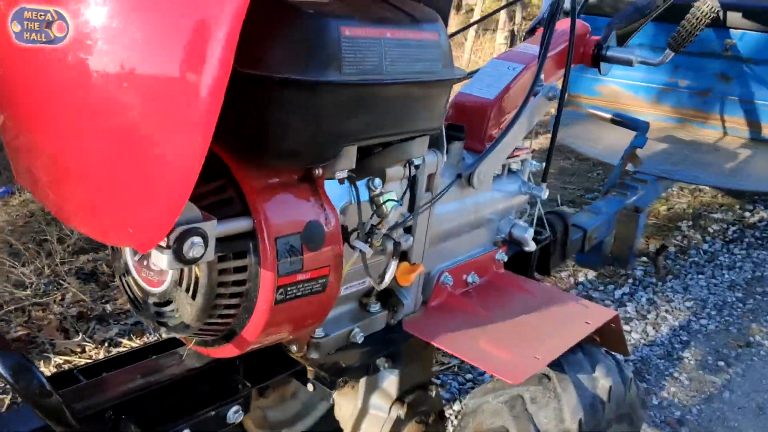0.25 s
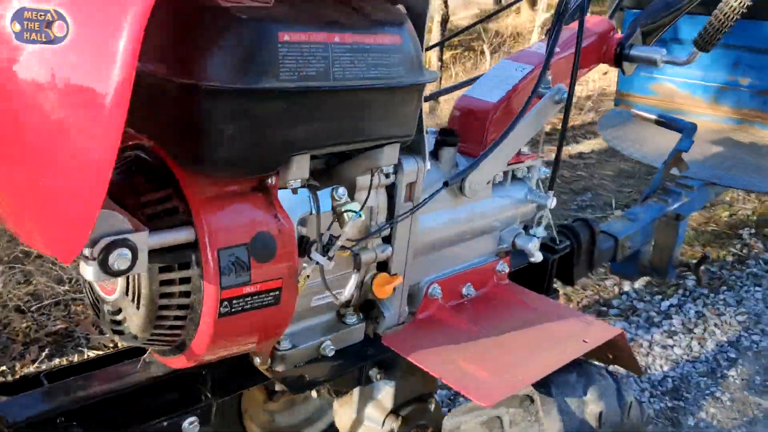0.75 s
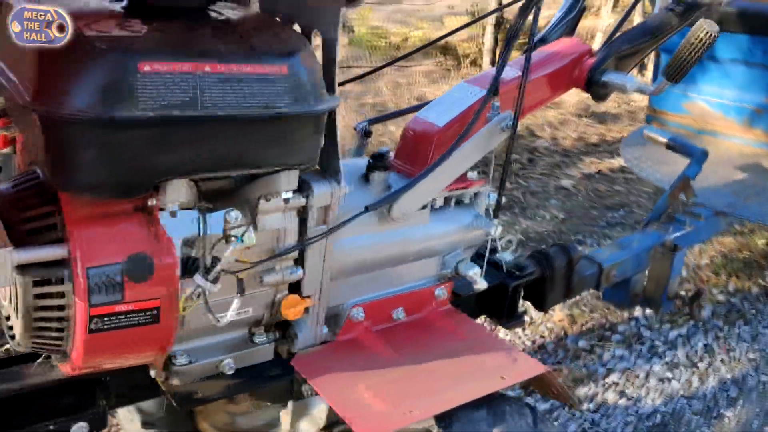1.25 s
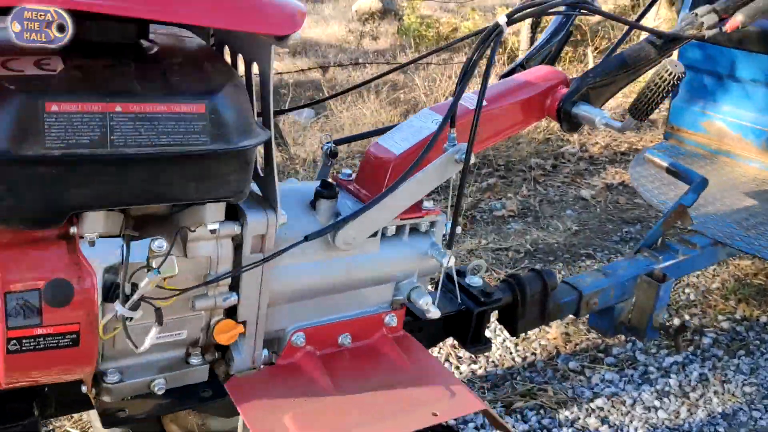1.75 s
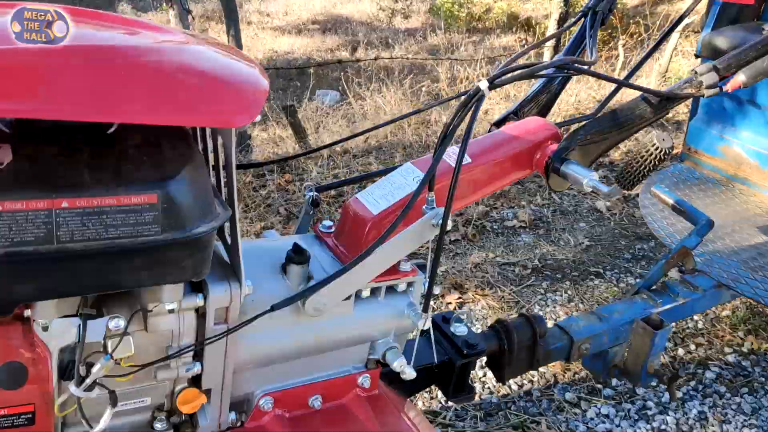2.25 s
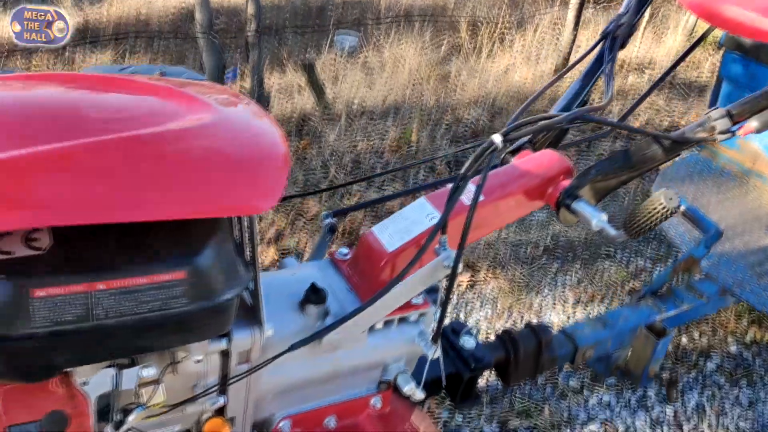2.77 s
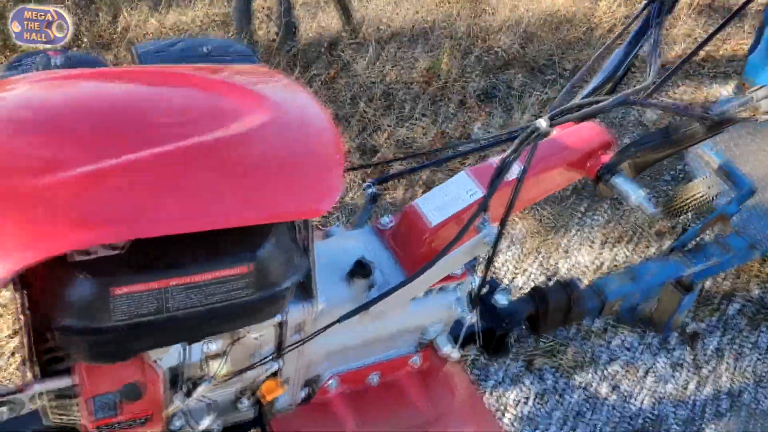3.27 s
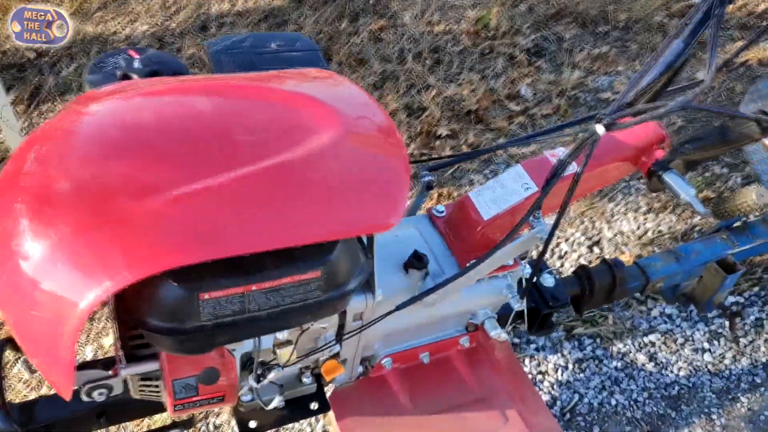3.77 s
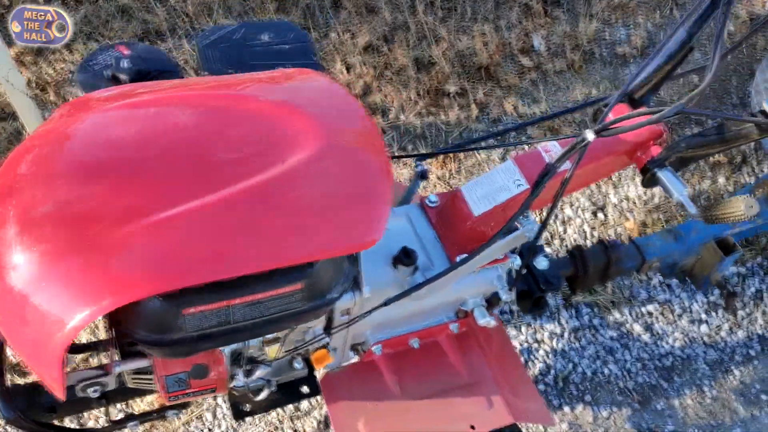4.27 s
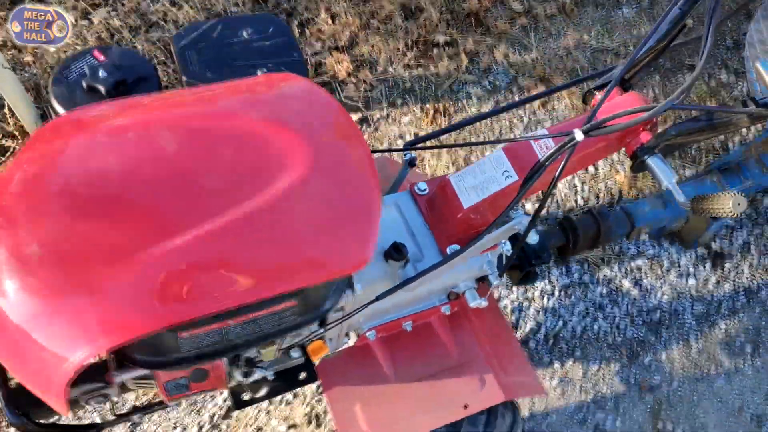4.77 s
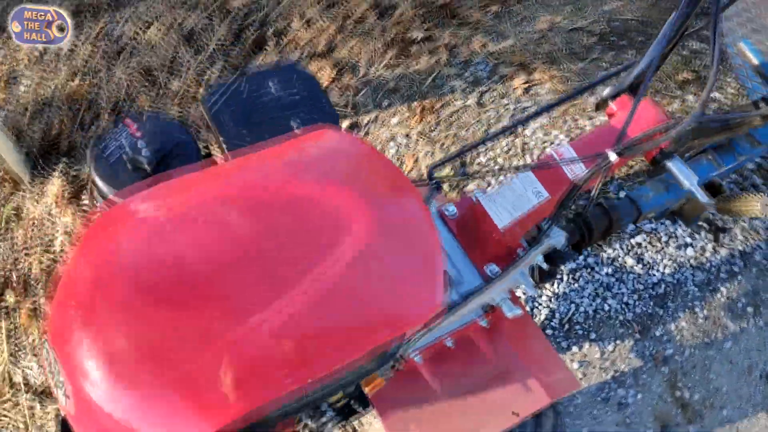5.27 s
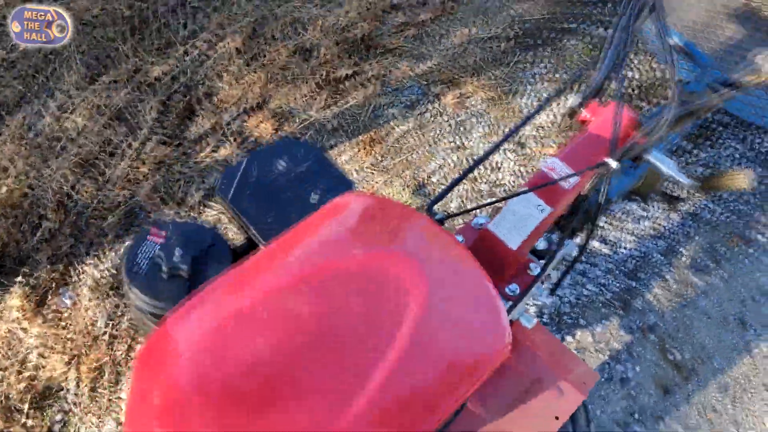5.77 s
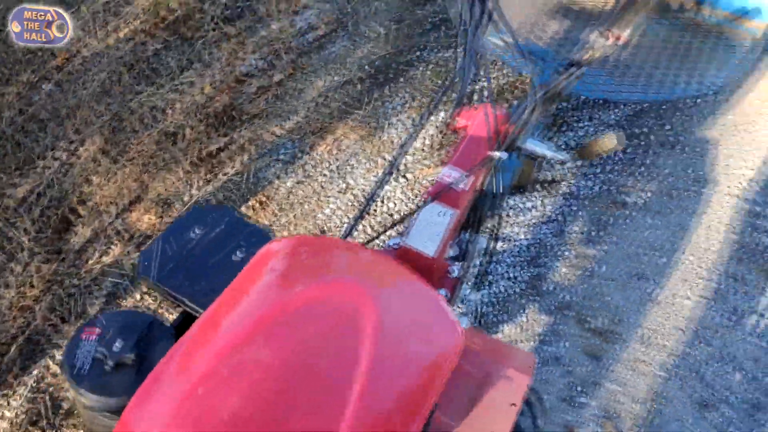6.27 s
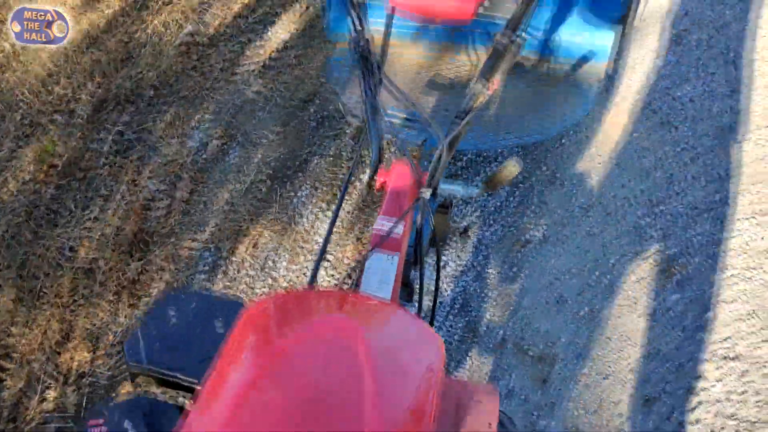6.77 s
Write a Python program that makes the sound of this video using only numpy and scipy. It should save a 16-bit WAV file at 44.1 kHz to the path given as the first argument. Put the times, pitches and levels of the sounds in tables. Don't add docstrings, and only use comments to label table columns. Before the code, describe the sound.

Close outdoor stereo of a small petrol engine idling with a fast, even, tinny buzz, stronger on the left. It starts rough with brief tin ringing, stumbles slightly around two seconds, then runs on. Finger knocks and clicks hit the handheld recorder, a shoe scrapes gravel just after four seconds, a very sharp click comes on the right past five, and the buzz dies near the end under soft wind.

```python
import sys
import numpy as np
from scipy import signal
from scipy.fft import rfft, irfft
from scipy.io import wavfile
from scipy.ndimage import map_coordinates

SR = 44100
rng = np.random.default_rng(int(sys.argv[2]) if len(sys.argv) > 2 else 0)


def to_wav(s):
    ch = np.atleast_2d(s).T
    pcm = np.round(np.clip(ch, -1, 1) * 32767)
    wavfile.write(sys.argv[1], SR, pcm.astype(np.int16))


def natural_amplitude(level_db):
    exponent = np.asarray(level_db, float) / 20
    return 10 ** exponent


N = 309582

# (time [s], rattle level [dB], left over right as the recorder turns [dB],
# share of the engine hidden by its hood [0-1])
WALK = [(0, -40.5, 15, 0.2), (.6, -37, 19, 0.26), (1.0, -36, 17, 0.19), (1.43, -36, 21, 0.02),
        (1.72, -38, 19.5, 0.3), (1.99, -37.5, 17.5, 0.23), (2.38, -38, 12.5, 0.34), (2.62, -36.5, 17, 0.26),
        (3.36, -37, 14.5, 0.34), (3.6, -43, 14, 0.4), (3.95, -40, 13.5, 0.5), (4.36, -40, 10.5, 0.73),
        (4.75, -39, 11, 0.63), (5.02, -46, 11, 0.8), (5.47, -45, 12, 0.73), (5.75, -40, 11, 0.9),
        (6.16, -37, 14, 0.86), (6.32, -41, 13.5, 0.55)]
# (start [s], end [s], steady over loose hum [dB], steady over loose rattle [dB])
STUMBLES = [
    (-.1, .45, 3, -4),
    (2.04, 2.47, -4, -2),
    (4.17, 4.55, 8, 1),
    (6.47, 7.2, -12, -15),
]
DIES_S, DIES_SPAN_S = 6.35, 0.18


def in_time(rows, outside=None):
    s, *columns = np.transpose(rows)
    return [np.interp(np.arange(N) / SR, s, c, outside, outside) for c in columns]


def at_hz(points, hz):
    points = np.array(points, float)
    return np.array([np.interp(np.log(hz), np.log(points[:, 0]), c) for c in points.T[1:]])


def rms_one(x):
    return x / np.sqrt(np.mean(x ** 2) + 1e-20)


def bump(s, half_s, order=2):
    return np.exp(-((np.arange(N) / SR - s) / half_s) ** order)


def ramp(s, span_s):
    return np.clip((np.arange(N) / SR - s) / span_s, 0, 1)


def drift(rate_hz):
    r = np.exp(-2 * np.pi * rate_hz * 64 / SR)
    noise = rng.standard_normal(N // 64 + 2002)
    slow = signal.lfilter([1], [1, -2 * r, r * r], noise)[2000:]
    slow = rms_one(slow - slow.mean())
    lines = slow[:-1, None] + np.diff(slow)[:, None] * np.arange(64) / 64
    return lines.ravel()[:N]


def band(x, low_hz, high_hz):
    sos = signal.butter(2, [low_hz, min(high_hz, .45 * SR)], "band", fs=SR, output="sos")
    return signal.sosfilt(sos, x)


def colour(x, points):
    top_hz = 15800
    hz = np.maximum(np.fft.rfftfreq(N, 1 / SR), 1)
    return irfft(rfft(x) * natural_amplitude(at_hz(points, hz)) * (hz < top_hz), N)


def both(pan_db):
    left = 2 / (1 + natural_amplitude(-np.asarray(pan_db)))
    return np.array([left, 2 - left])


def add(out, s, sound):
    i = round(s * SR)
    out[:, i:i + sound.shape[1]] += sound[:, :N - i]


def share_db(ratio_db):
    return -10 * np.log10(1 + natural_amplitude(-2 * ratio_db))


def roughness():
    settle_s = .12
    early = settle_s / 2
    return np.array([ramp(a - early, settle_s) - ramp(b - early, settle_s) for a, b, *_ in STUMBLES])


def changes():
    # (rattle [dB], hum [dB], hiss [dB], left over right [dB], steady over loose hum [dB],
    # steady over loose rattle [dB])
    usual = [-42, -52, -53, 10.5, 9.0, 5.0]
    # (middle [s], half length [s], loss of rattle [dB])
    shades = [
        (0.36, 0.13, 5.5),
        (0.876, 0.081, 4),
        (1.882, 0.079, 6.5),
        (2.121, .055, 13),
        (2.209, 0.039, 8),
        (2.284, 0.037, 8.5),
        (3.057, 0.032, 3),
        (4.095, 0.11, 2),
        (4.594, 0.13, 7),
        (6.591, 0.055, -8.5),
    ]
    rattle, pan, hidden = in_time(WALK)
    shade = sum(db * bump(s, half, order=4) for s, half, db in shades)
    dying = ramp(DIES_S, DIES_SPAN_S)
    hum_dying = ramp(DIES_S + 0.056, DIES_SPAN_S)
    behind = ramp(5.51, 0.21)

    hum = -58 + (-53.5 - -58) * hidden - 0.14 * shade - 5.5 * hum_dying
    hiss = -45.5 + (-56.5 - -45.5) * hidden + 0.38 * (rattle - usual[0]) - 4 * dying
    rattle = rattle - shade - 15.5 * dying
    pan = pan - 5.5 * dying
    hum_tilt = -0.8 - 4 * behind
    rattle_tilt = -1.2 + (-2.5 - -1.2) * hidden
    whole = np.array([hum - usual[1], rattle - usual[0], hiss - usual[2], hum_tilt, rattle_tilt, np.zeros(N)])

    even = np.array([[8.8], [6.3]])
    ratio = even + (np.transpose(STUMBLES)[2:] - even) @ roughness()
    ratio[1] += .35 * (whole[1] + shade)
    usual_ratio = np.array(usual[4:])[:, None]
    steady, loose = whole.copy(), whole.copy()
    steady[:2] += share_db(ratio) - share_db(usual_ratio)
    loose[:2] += share_db(-ratio) - share_db(-usual_ratio)
    turned = np.zeros((6, 2, N))
    turned[1, 1] = usual[3] - pan
    return steady[:, None] + turned, loose[:, None] + turned


def blend(change_db, hz):
    place = np.interp(np.log(hz), np.log([1000, 2330, 4400, 6500]), [0.035, 0.85, 1.2, 1.706])
    k = min(int(place), 1)
    hum_lean = np.interp(np.log2(hz / 600), [-1.6, -.6, 1], [0, -1, 1])
    rattle_lean = np.clip(np.log2(hz / 2500), -.5, .8)
    lean = [hum_lean, rattle_lean, 0]
    here = change_db[k] + lean[k] * change_db[3 + k]
    above = change_db[k + 1] + lean[k + 1] * change_db[4 + k]
    return here + (place - k) * (above - here)


def ridge_now():
    open_hz, hidden_hz = 2800, 2130
    centre_hz = open_hz + (hidden_hz - open_hz) * in_time(WALK)[2]
    lift_db = 4.5 + 0.5 * roughness().sum(0)
    return centre_hz, lift_db * (1 - ramp(DIES_S, DIES_SPAN_S))


def ridge_db(hz, centre_hz, lift_db):
    width_hz = 276
    if not 1700 < hz < 3700:
        return 0
    return lift_db * (np.exp(-((hz - centre_hz) / width_hz) ** 2) - .3)


def colour_swells():
    # (pitch [Hz], middle [s], half length [s], level change [dB])
    passing_swells = [(3020, 0.41, 0.13, 3), (8000, 0.59, 0.1, 4), (3100, 0.77, .15, 1), (4140, 1.3, 0.3, 2),
                      (8500, 1.6, .15, -1), (3200, 2.25, 0.11, -7), (6560, 2.82, 0.22, -5),
                      (8100, 3.73, 0.38, 2.5), (2820, 6.1, 0.26, 0.5), (4600, 5.74, 0.46, 2.5),
                      (8900, 6.4, 0.64, -4.5), (1220, 6.2, .45, 1), (14000, 6.1, .45, 4), (5200, .4, 0.11, -4),
                      (2280, 2.5, .06, 1.5), (1850, 1.47, 0.33, -2), (1600, 2.07, 0.073, -3),
                      (3000, 1.09, .15, 2), (1990, 4.05, .15, -3), (2080, 4.95, 0.17, -1),
                      (2120, 5.45, 0.12, -2.5), (1600, 4.47, 0.33, -4), (3700, 3.6, 0.13, -6),
                      (1500, 6.8, 0.12, -5.5), (700, 6.55, .15, 2), (5500, 4.64, 0.14, 5)]
    octaves = 0.22
    swells = [(hz, db * bump(s, half)) for hz, s, half, db in passing_swells]

    def level_db(pitch_hz):
        near = [(pitch_hz / hz, swell) for hz, swell in swells if .6 < pitch_hz / hz < 1.6]
        return sum(np.exp(-(np.log2(ratio) / octaves) ** 2) * swell for ratio, swell in near)
    return level_db


def steady_buzz(turn, change_db, sway_db, apart_db, smear):
    # (multiple of the turn rate, left level [dB], right level [dB])
    low_orders = [(1, -90, -88), (2, -63.5, -64), (3, -65, -64.5), (4, -99, -77), (5, -65, -68),
                  (6, -62, -63), (7, -65, -87), (8, -88, -63), (9, -62.5, -99), (10, -57, -57.5),
                  (11, -58, -55.5), (12, -57, -80), (13, -54, -77), (14, -51.5, -93), (15, -54.5, -54.5),
                  (16, -77, -55.5), (17, -59, -65), (18, -56, -62), (19, -50, -59.5), (20, -54.5, -61.5),
                  (21, -63, -57), (22, -54, -53)]
    # (pitch [Hz], left level [dB], right level [dB])
    rattle = [(1670, -60.5, -66.5), (1800, -59.5, -57.5), (2290, -54.5, -61), (2646, -57, -71),
              (2758, -69, -43), (2746, -54.5, -91), (3260, -63, -57), (3600, -62.5, -69),
              (4350, -66.5, -67.5), (4660, -70.5, -69)]
    # (multiple, middle [s], half length [s], lift, negative for a
    # drop [dB])
    panels = [(10, 0.51, .45, 6), (10, 2.32, 0.14, 4), (10, 6.1, 0.49, -29), (11, 3.17, 0.65, 8),
              (11, 4.83, 0.28, 4), (11, 5.93, 0.4, -17), (14, 0.71, 0.36, 1), (14, 1.6, 0.38, -6),
              (14, 4.6, 0.33, 2), (16, 1.37, 0.35, 10.5), (16, 3.2, .4, -1), (16, 4.95, 0.24, -13),
              (19, 0.69, 0.27, -6), (19, 3.3, 0.5, 1.5), (19, 4.23, 0.31, -14), (19, 5.4, 0.33, 5.5),
              (12, 6.4, .5, 2.5), (14, 6.3, 0.4, -2), (18, 5.8, .6, 4), (8, 6.1, 0.36, 4),
              (17, 5.9, 0.55, 5), (22, 1.0, 0.8, -5), (20, 0.74, .5, -4), (28, 1.2, 0.71, -12),
              (28, 6.4, 2.3, -7), (38, 0.97, 0.55, 4), (43, 1.44, 0.29, 8), (43, 6.14, .4, 6),
              (19, 1.95, 0.17, -3), (16, 1.95, .2, -2), (39, 1.35, 0.45, 5.5), (44, 1.4, .3, 3),
              (47, 1.8, .3, 2), (54, 1.4, .3, 11), (36, 2.8, 0.46, 3.5), (40, 2.7, 0.27, 2.5),
              (47, 2.7, .25, 4), (48, 2.9, .25, 5), (47, 5.8, .7, -7), (34, 5.8, .45, 5.5),
              (37, 6.35, .35, 4), (38, 6.2, .4, 4), (38, 3.2, 0.28, 0), (40, 5.9, 0.44, 4.5),
              (41, 6.1, .3, 4)]
    # (time [s], depth [0-1])
    firing_depth = [(0, 0.37), (1.2, 0.14), (2.5, 0.17), (7.02, 0)]
    out, top = np.zeros((2, N)), len(low_orders)
    struck = np.cumsum(np.repeat(rng.uniform(0, 2 * np.pi, 14), 6))
    ridge, swell_db = ridge_now(), colour_swells()
    firing = 1 + in_time(firing_depth)[0] * np.cos(turn / 2 + 1.0)
    for k in range(2, 80):
        hz = 69 * k
        if k <= top:
            level_db = np.array(low_orders[k - 1][1:])
        else:
            level_db = at_hz(rattle, hz) + rng.normal(0, 3.0)
        level_db = level_db - 30 * max(np.log2(hz / 4600), 0)
        singing = [db * bump(s, half) for multiple, s, half, db in panels if round(multiple) == k]
        if singing:
            sway = sum(singing)
        else:
            sway = sway_db * min(0.38 + hz / 2500, 1) * drift(1.0)
        sway = sway + ridge_db(hz, *ridge) + swell_db(hz)
        sway = sway + apart_db * drift(0.35) * [[.5], [-1]]
        wave = np.sqrt(2) * np.sin(k * turn + struck[k] + smear * drift(0.92))
        if k > top:
            wave = wave * firing
        out += natural_amplitude(level_db[:, None] + blend(change_db, hz) + sway) * wave
    return out


def loose_noise(turn, change_db, patchy_db, throb):
    # (pitch [Hz], left level [dB per Hz], right level [dB per Hz])
    loose_levels = [(200, -90, -91.5), (495, -91, -90), (800, -84.5, -83.5), (1210, -77.5, -84),
                    (1530, -77.5, -79.5), (1940, -77, -87), (2520, -74.5, -86.5), (3140, -76.5, -90),
                    (4020, -80.5, -84), (5420, -89.5, -89), (6680, -88, -84.5), (8020, -88.5, -79.5),
                    (8730, -88, -91), (12200, -94, -97), (15700, -103, -103)]
    # (pitch [Hz], left-right likeness [0-1])
    likeness = [(200, 1), (500, 0.97), (1500, 0.68), (3000, 0.32), (6000, 0.14), (12000, 0)]
    out, edges = 0, 220 * 2 ** (np.arange(20) / 3)
    white, pulse = rng.standard_normal((2, 2, N)), 1 + throb * np.cos(turn)
    ridge, swell_db = ridge_now(), colour_swells()
    for k, (low, high) in enumerate(zip(edges, edges[1:])):
        mid, side = band(white[k % 2], low, high)
        hz = np.sqrt(low * high)
        alike = np.clip(at_hz(likeness, hz), 0, 1)
        level_db = blend(change_db, hz) + swell_db(hz) + 1.08 * ridge_db(hz, *ridge) + patchy_db * drift(4.2)
        if hz > 5000:
            level_db = level_db + 1.5 * drift(1.47)
        noise = np.sqrt(1 + alike) * mid + np.sqrt(1 - alike) * side * [[1], [-1]]
        out = out + natural_amplitude(level_db) * noise
    return colour(out * pulse * np.sqrt(SR / 4), loose_levels)


def engine():
    # (time [s], turns per second [1/s])
    turn_rate = [(0, 68.8), (1.12, 68.82), (1.33, 69.02), (2.0, 69.12), (2.6, 69.08), (3.0, 69.08),
                 (3.7, 69.16), (4.1, 69.0), (4.6, 69.16), (5.0, 69.06), (5.4, 69.02), (5.9, 68.88),
                 (7.02, 68.9)]
    # (middle [s], half length [s], change of turns per second [1/s])
    surges = [
        (0, .06, -1.5),
        (.13, .04, .8),
        (.24, .04, -.8),
        (.36, .07, 1.2),
        (2.21, .065, 2.1),
        (2.36, .05, -.6),
        (6.66, .08, 1.6),
    ]
    rate = in_time(turn_rate)[0] + sum(change * bump(s, half) for s, half, change in surges)
    turn = 2 * np.pi * np.cumsum(rate) / SR
    steady, loose = changes()
    buzz = steady_buzz(turn, steady, sway_db=2.0, apart_db=3.5, smear=0.81)
    return buzz + loose_noise(turn, loose, patchy_db=.8, throb=.1)


def arrive(x):
    # (time [s], delay of the left port [samples])
    left_lag = [
        (0, 14.5),
        (3.5, 15.6),
        (7.02, 18.1),
    ]
    when = np.arange(N) - in_time(left_lag)[0]
    return np.array([map_coordinates(x[0], [when], order=3, mode="reflect"), x[1]])


def rings():
    # (pitch [Hz], middle [s], half length [s], rms level [dB])
    ringing = [
        (2600, .02, .02, -44),
        (2500, .025, .02, -45.5),
        (2630, 0.064, .025, -46),
        (2500, 0.17, .025, -48),
        (2725, .15, .06, -48),
        (2720, .25, .03, -46),
        (2900, .17, 0.056, -50),
        (2960, .27, .03, -52),
        (2840, .37, .02, -46),
        (2740, 0.39, 0.099, -51),
    ]
    width_hz, pan_db = 22, 13
    out, t = np.zeros((2, N)), np.arange(SR) / SR
    r = np.exp(-np.pi * width_hz / SR)
    for (hz, s, half, db), noise in zip(ringing, rng.standard_normal((len(ringing), 2 * SR))):
        poles = [1, -2 * r * np.cos(2 * np.pi * hz / SR), r * r]
        once = signal.lfilter([1], poles, noise)
        tone = rms_one(signal.lfilter([1], poles, once)[SR:])
        add(out, 0, natural_amplitude(db) * both([pan_db]) * tone * np.exp(-((t - s) / half) ** 2))
    return arrive(out)


def wind(gust_db):
    # (middle [s], half length [s], swell [dB], left over right [dB])
    gusts = [
        (0, 0.092, 12, 4.5),
        (.5, 0.21, 4, 0),
        (1.472, 0.096, 7.5, 8),
        (3.26, 0.071, 3, -2),
        (4.002, 0.5, 6.5, 3),
        (5.753, .12, 2, -9),
        (6.05, .25, 3, 6),
        (6.397, .12, 4, -7),
        (6.755, 0.33, 3, 3.5),
        (7.02, 0.39, 8, -2),
    ]
    level_db = -63.5 + sum(db * bump(s, half) for s, half, db, _ in gusts)
    pan_db = 1.2 + sum(pan * bump(s, half) for s, half, _, pan in gusts)
    rumble = signal.lfilter([1], [1, -.994], band(rng.standard_normal((2, N)), 19.5, 179))
    lumps_db = gust_db * np.array([drift(7.2), drift(5.3)])
    return natural_amplitude(level_db + 2.5 + lumps_db) * both(pan_db) * rms_one(rumble)


def self_noise():
    # (pitch [Hz], left level [dB per Hz], right level [dB per Hz])
    hiss_levels = [(2000, -112, -112), (9000, -103, -103), (13600, -101, -101), (15900, -106, -106)]
    return colour(rng.standard_normal((2, N)) * np.sqrt(SR / 2), hiss_levels)


def handling():
    # (time [s], peak level [dB], left over right [dB], knock pitch [Hz])
    knocks = [(.183, -29.5, 26, 800), (1.477, -36.5, 18, 122), (1.529, -41.5, 0, 177),
              (2.699, -37.5, 21, 332), (2.977, -38, 18, 233), (3.195, -39, -18, 257),
              (3.451, -38, -26, 220), (3.8553, -29, 27, 286), (4.038, -36.5, 5, 446),
              (4.4508, -31, 20, 233), (4.5017, -32.5, 38, 228), (4.579, -38.5, 23, 313),
              (4.942, -37, 16, 221), (5.217, -28, -26, 580), (6.631, -31, -3, 1700), (6.919, -45, 20, 220),
              (4.7854, -36, 25, 1600), (5.217, -27, -24, 1300), (6.597, -38, -5.5, 1000),
              (6.6105, -39, 0, 1500)]
    # (time [s], peak level [dB], left over right [dB], knock pitch [Hz])
    thuds = [(0.184, -34, 29, 200), (0.343, -36.5, 19, 177), (.58, -31.5, 25, 335), (1.391, -47.5, 17, 252),
             (2.37, -43, 35, 250), (3.079, -45, 14, 220), (3.232, -41.5, -21, 250), (4.786, -22, 28, 289),
             (5.218, -40.5, -13, 257), (6.6208, -34, 15, 171), (6.678, -43, 15, 220), (6.7, -45, 12, 222),
             (6.754, -29.5, 13, 237), (6.864, -44, 14, 200)]
    letting_go = [.344, 1.477, 3.195, 3.232, 3.451, 3.856, 4.452, 4.503, 4.579, 4.942, 6.621, 6.632, 6.678]
    # (time [s], peak level [dB], left over right [dB], length [s])
    clicks = [(1.516, -33, -13, 0.0022), (3.858, -26, 20, 0.0023), (4.1425, -25.5, 18, 0.0025),
              (4.448, -38.5, 14, 0.0023), (4.787, -21, 18, 0.0022), (4.944, -34.5, 8, .002),
              (5.2173, -9.5, -38, 0.0006), (6.5823, -27, -10, .002), (6.5867, -27, -14.5, 0.002),
              (6.5936, -27, -14, 0.004), (6.597, -32, -10, 0.0018), (6.61, -36, -5, .002),
              (6.621, -31, 15, .002), (6.771, -40, 0, .002), (6.923, -39.5, 0, .004),
              (7.010, -34, -7, .004)]
    out, t = np.zeros((2, N)), np.arange(round(.08 * SR)) / SR
    hurried = t + 0.00073 * (1 - np.exp(-t / 0.000085))
    after_swing = np.sin(2 * np.pi * 58 * (t - .004)) * natural_amplitude(-60 * t / 0.055) * (1 - np.exp(-t / 0.003)) * 2.15
    for rows, swing_db in [(knocks, -17.5), (thuds, -7)]:
        for s, db, pan_db, hz in rows:
            knock = np.sin(2 * np.pi * hz * hurried) * natural_amplitude(-60 * t * hz / 4.2) * 1.4
            shell = band(knock + natural_amplitude(swing_db) * after_swing, 10, 6000)
            outward = 1 if np.abs(np.subtract(letting_go, s)).min() < .003 else -1
            add(out, s + 0.001524, outward * natural_amplitude(db) * both([pan_db]) * shell)
    for (s, db, pan_db, length), noise in zip(clicks, rng.standard_normal((len(clicks), len(t)))):
        snap = noise * natural_amplitude(-60 * t / max(length, 1e-4))
        snap[0] = 3
        port_hz = 6750 if 6.5 < s < 6.61 else 7600
        ring = np.sin(2 * np.pi * port_hz * t) * natural_amplitude(-60 * t / 0.0026)
        open_db = np.clip(0.67 * pan_db, -8, 10)
        crack = natural_amplitude(open_db) * band(snap, 5500, 10300) / 3
        click = crack + np.convolve(snap, ring)[:len(t)] / 5
        add(out, s + 0.000897, natural_amplitude(db) * both([pan_db]) * click / np.abs(click).max())
    return out


def creaks(slips_per_s):
    # (middle [s], half length [s], rms level [dB], left over right [dB])
    drags = [
        (0.188, 0.022, -43.5, 6),
        (1.5193, 0.0016, -33.5, -10),
        (1.5236, .005, -35.5, 1),
        (1.542, 0.0022, -38, -10),
        (5.542, 0.004, -47, -9.5),
        (5.734, .004, -50, -2),
        (6.595, .012, -46, 1),
        (6.62, .01, -54, 3),
        (6.923, 0.0048, -51, 0),
        (7.003, 0.023, -52, -4),
    ]
    centre_hz, width_hz = 7260, 1500
    slips = rng.standard_normal((2, N)) * (rng.random((2, N)) < slips_per_s / SR)
    ring = rms_one(band(slips, centre_hz - width_hz / 2, centre_hz + width_hz / 2))
    rasp = natural_amplitude(-1) * rms_one(band(slips, 530, 7800))
    return (ring + rasp) * sum(natural_amplitude(db) * both([pan_db]) * bump(s, half) for s, half, db, pan_db in drags)


def scuff(grains_per_s, spread_db):
    # (time [s], level [dB])
    scrapes = [
        (4.186, -49),
        (4.197, -32.5),
        (4.212, -29),
        (4.33, -33),
        (4.41, -36.5),
        (4.43, -41),
        (4.504, -38.5),
        (4.736, -52),
        (4.78, -59),
    ]
    # (pitch [Hz], level [dB per Hz])
    gravel = [(1500, -26), (2400, 4.5), (3500, -14), (4600, 1.5), (6800, 6), (7700, 10), (9000, 1),
              (11000, -7), (14700, -24)]
    sizes = natural_amplitude(spread_db * np.minimum(rng.exponential(1, (3, N)), 4)) * rng.choice([-1, 1], (3, N))
    grit = sizes * (rng.random((3, N)) < grains_per_s / SR)
    level = natural_amplitude(in_time(scrapes, -120)[0] + 1.0)
    return level * both([1.5]) * rms_one(colour(grit[0] + 2.6 * grit[1:], gravel))


def rub():
    # (time [s], level [dB])
    brushing = [
        (6.74, -63),
        (6.79, -57),
        (6.84, -53),
        (6.89, -63),
        (6.92, -80),
    ]
    rustle = rms_one(band(rng.standard_normal(N), 11700, 13300))
    return natural_amplitude(in_time(brushing, -120)[0]) * both([8.0]) * rustle


def scene():
    from_outside = arrive(engine() + scuff(grains_per_s=11000, spread_db=3.0))
    at_ports = wind(gust_db=4.5) + handling() + creaks(slips_per_s=6000) + rub()
    return from_outside + rings() + at_ports + self_noise()


def band_limit(x):
    return signal.sosfilt(signal.butter(12, 16980, fs=SR, output="sos"), x)


def record(dry):
    mix = signal.sosfilt(signal.cheby2(12, 60, 16500, fs=SR, output="sos"), dry)
    return band_limit(mix)


dry = scene()
out = record(dry)
to_wav(out)
```